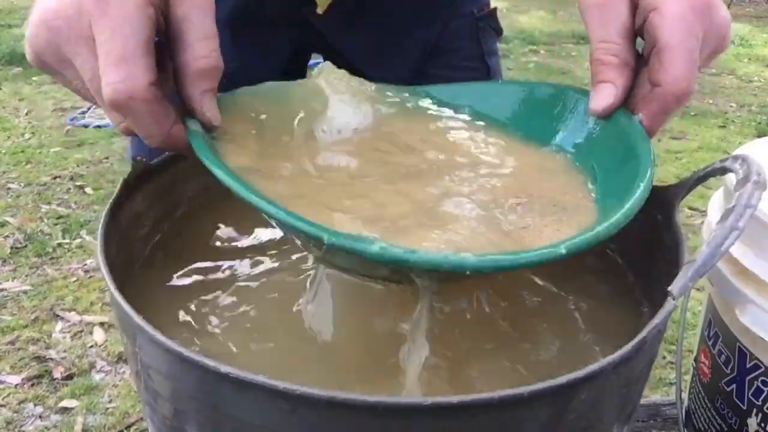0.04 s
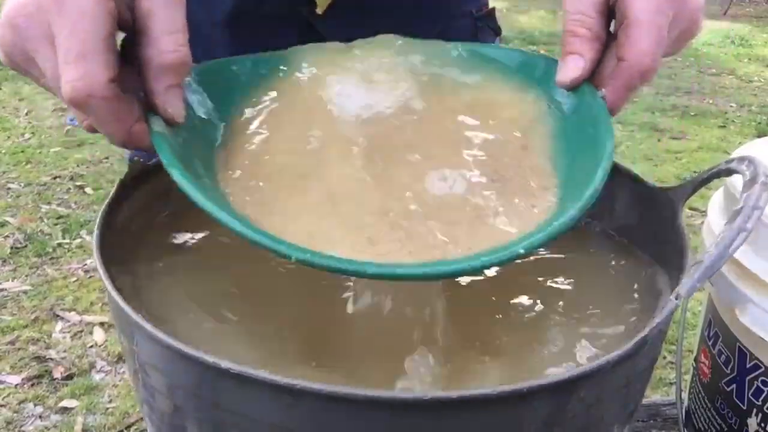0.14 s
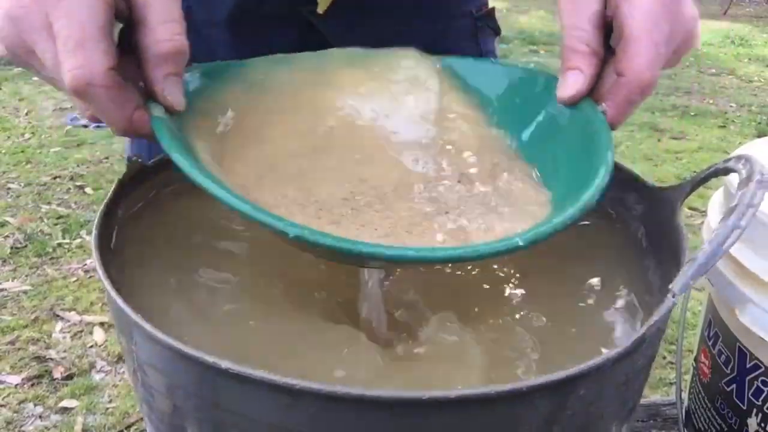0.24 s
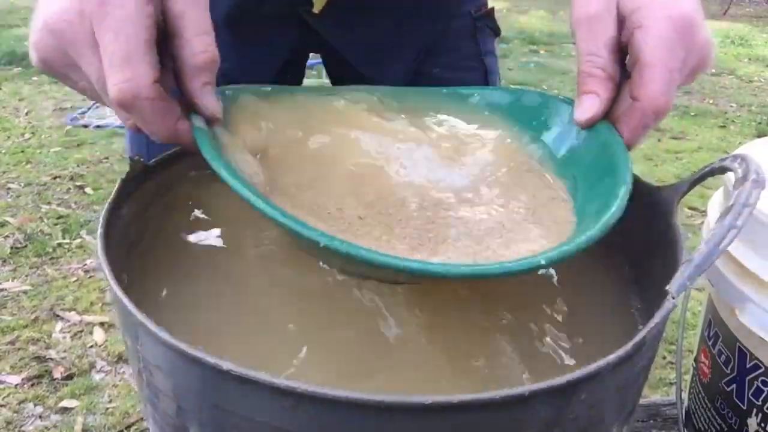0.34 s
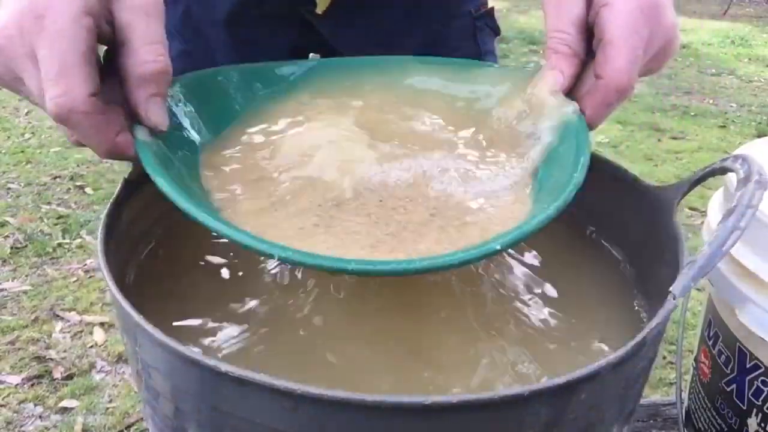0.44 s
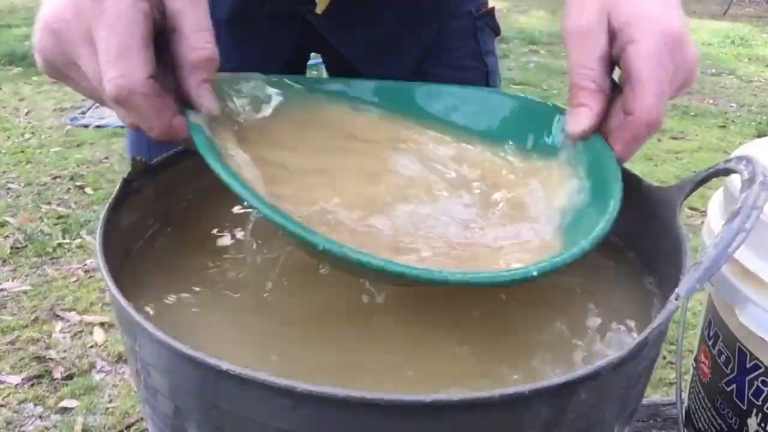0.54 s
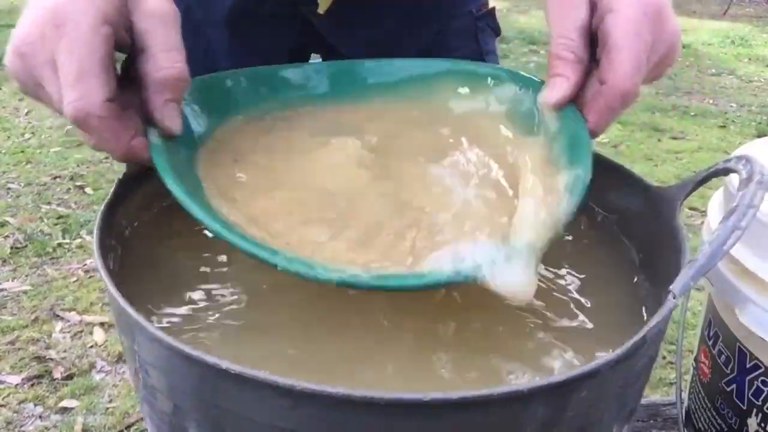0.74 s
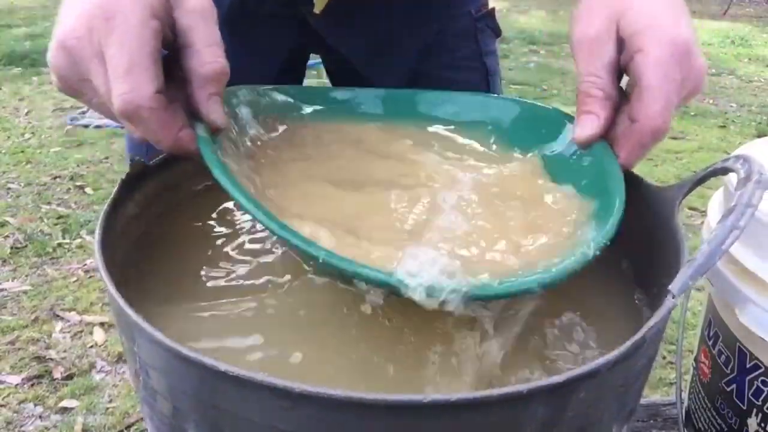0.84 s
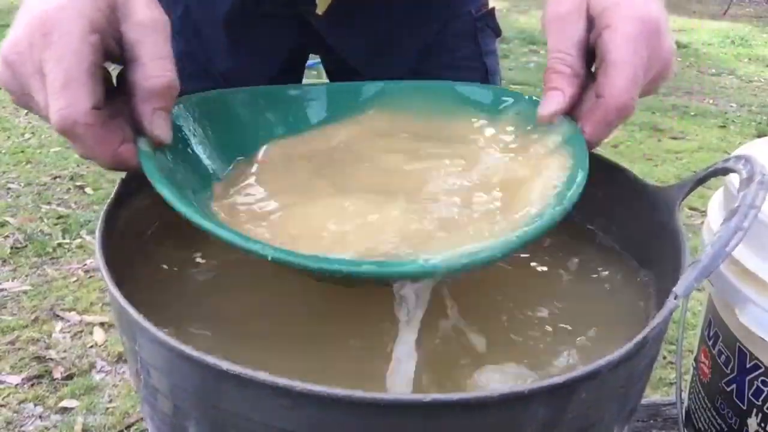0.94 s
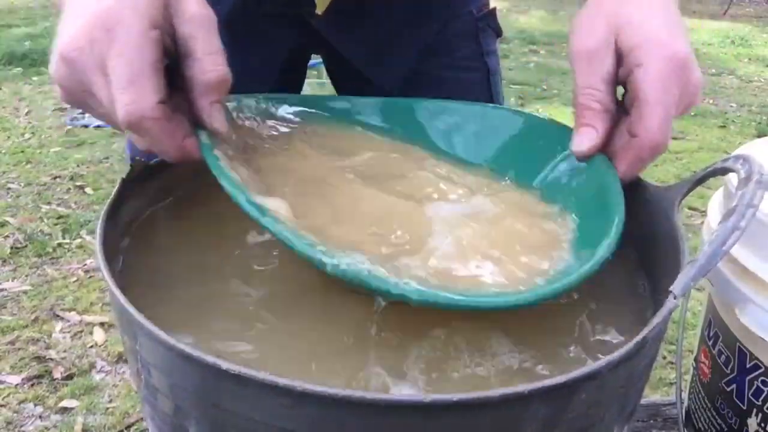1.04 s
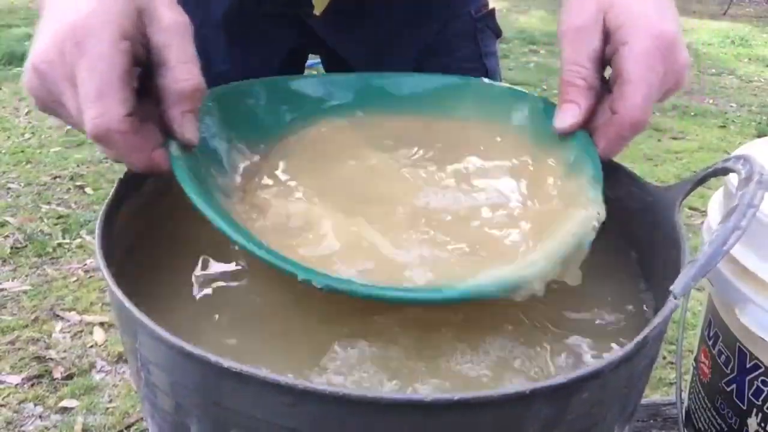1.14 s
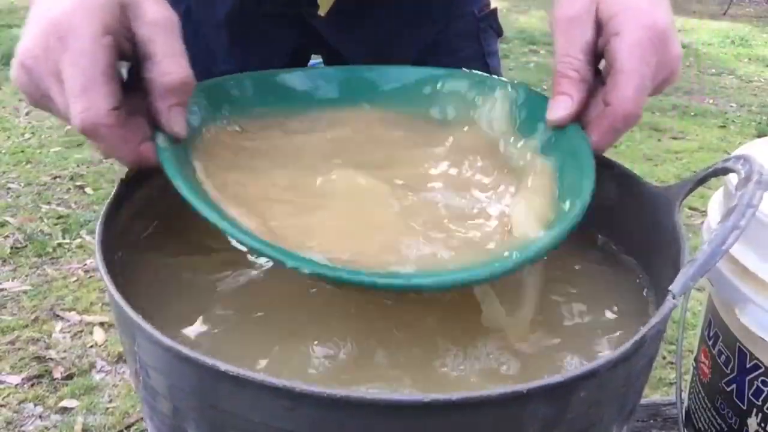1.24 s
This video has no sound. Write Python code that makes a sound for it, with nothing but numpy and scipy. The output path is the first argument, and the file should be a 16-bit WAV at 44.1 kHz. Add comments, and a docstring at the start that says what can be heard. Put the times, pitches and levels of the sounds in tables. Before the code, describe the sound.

Swirled water spills and splashes into a half-full tub, plopping and trickling close by.

```python
"""Muddy water spilling into a tub

Water is swirled in a plastic pan and spills over the rim into a half-full tub, close by, outdoors.
It slaps the surface and traps air bubbles that ring as plops; small bubbles and spray fill the gaps.
The tub wall echoes within milliseconds, over a faint hollow note and an outdoor rumble."""
import sys
import numpy as np
from scipy import signal
from scipy.fft import rfft, irfft
from scipy.io import wavfile
from scipy.ndimage import uniform_filter1d

SR = 44100
rng = np.random.default_rng(int(sys.argv[2]) if len(sys.argv) > 2 else 0)


def generate_wav(sig):
    """Save sig (samples, or channels by samples) to the path in sys.argv[1] as 16-bit PCM at SR."""
    pcm = np.round(np.clip(np.atleast_2d(sig).T, -1, 1) * 32767).astype(np.int16)
    wavfile.write(sys.argv[1], SR, pcm)


N = 57330
T = np.arange(N) / SR


# trapped air bubbles: t/s, f/Hz, level/dB, decay/cycles
PLOPS = [(0.0243, 1280, -32.5, 3.3), (.0594, 3370, -28, 8.3), (0.0775, 3630, -35, 11.5),
         (0.0965, 1418, -39.5, 8.8), (0.1105, 1676, -43.5, 7.4), (0.1225, 4670, -32, 22),
         (0.135, 3670, -35, 13), (0.1522, 3800, -32.5, 14.6), (.1655, 1280, -32.5, 7.7),
         (0.1655, 2920, -31, 3.5), (0.1895, 2650, -32.5, 1.4), (0.197, 1710, -39, 17),
         (0.211, 1198, -39, 7.7), (.2330, 1314, -32, 4.1), (0.2738, 1380, -29, 2.3),
         (0.2785, 5470, -22.5, 4.2), (0.2966, 4000, -34.5, 8.8), (.3120, 607, -47, 7.4),
         (0.3477, 4420, -23.5, 9.9), (0.3487, 2020, -32, 6.3), (.3660, 1977, -28, 14.5),
         (0.3698, 2875, -25, 7.8), (0.3704, 9000, -17.5, 4.6), (0.371, 1370, -29.5, 5.3),
         (0.406, 1200, -35.5, 9.4), (.4145, 717, -40, 4.7), (0.425, 1142, -30, 3.3),
         (0.4402, 1267, -21, 3.7), (0.4473, 4460, -24, 1.8), (0.4505, 1600, -32, 2.4),
         (.459, 2415, -21, 7.1), (0.4601, 2680, -13.5, 5.5), (0.4704, 1530, -30.5, 6.8),
         (0.4826, 1204, -22.5, 11.6), (0.522, 513, -47.5, 5), (0.523, 320, -52, 2.8),
         (0.541, 182, -45.5, 1.7), (0.579, 2090, -39.5, 6.1), (.5810, 3130, -32, 5), (0.623, 3900, -45, 21),
         (0.628, 4800, -38.5, 3.3), (.721, 3450, -48, 5), (.8360, 2220, -34, 6.9), (0.8368, 1570, -37.5, 4),
         (.8527, 1380, -33, 0.71), (0.8709, 1410, -34, 2), (0.8905, 960, -35, 1.6),
         (0.9245, 1710, -36, 4.3), (0.975, 3330, -40.5, 4.3), (1.0476, 5360, -33.5, 2.3),
         (1.1024, 1270, -29.5, 0.72), (1.113, 3630, -40, 17)]

def plops(wobble_depth=.48, wobble_s=.0012, full_wobble_hz=3500, size=8192):
    """Larger bubbles ring one by one; the smaller they are, the more the churning water shakes them."""
    out = np.zeros(N)
    for start, hz, db, cycles in PLOPS:
        shake = (wander(wobble_s, size) + 1j * wander(wobble_s, size)) / np.sqrt(2)
        depth = wobble_depth * min(hz / full_wobble_hz, 1)
        calm = bubble(hz, max(cycles, 1))
        shaken = bubble(hz, max(cycles, 1), depth * shake)
        add(out, start, undb(db) * shaken * np.linalg.norm(calm) / np.linalg.norm(shaken))
    return out


def spatter(count=6, within_s=.009, centre_hz=3300, relative_db=-12, plop_cap_db=-25):
    """Each plop scatters tiny droplets that land just after it."""
    out = np.zeros(N)
    for start, _, db, _ in PLOPS:
        gain = undb(min(db, plop_cap_db) + relative_db)
        for late, pitch, size in rng.random((count, 3)):
            droplet = bubble(centre_hz * 2 ** (2 * pitch - 1), cycles=2.5)
            add(out, start + within_s * late, size * gain * droplet)
    return out


def bubble(hz, cycles, wobble=0, rise_per_cycle=.00098, max_rise=.12):
    """A bubble swells, rings down and sharpens as it nears the surface; wobble shakes level and phase."""
    t = T[:int(7 * cycles / hz * SR) + 16]
    turns = t * hz
    attack_s = .0003 + .8 / hz
    env = (1 - np.exp(-t / attack_s)) * np.exp(-turns / cycles)
    glide_hz = hz * (1 + np.minimum(rise_per_cycle * turns, max_rise))
    tone = np.exp(2j * np.pi * np.cumsum(glide_hz) / SR) * (1 + np.resize(wobble, len(t)))
    return env / env.max() * tone.imag


# surface impacts: t/s, level/dB, centre f/Hz, decay/s
IMPACTS = [(0.0253, -37.5, 2340, 0.0035), (0.0589, -40, 3360, 0.0037), (0.1337, -45, 9050, 0.0036),
           (0.152, -39.5, 4300, 0.0051), (0.23, -43, 3000, 0.0038), (0.24, -40.5, 5560, 0.001),
           (0.2723, -34, 3330, 0.007), (0.279, -25, 6850, 0.00059), (0.3457, -38, 10500, 0.0022),
           (0.3538, -37.5, 8400, 0.004), (0.3654, -29, 3520, 0.0037), (0.3694, -24.5, 9900, 0.0017),
           (.4400, -29, 2390, 0.0011), (0.4478, -35, 6800, 0.0024), (0.47, -34, 8800, 0.00086),
           (0.4775, -44, 3620, 0.0035), (0.507, -39.5, 8350, 0.002), (0.514, -39.5, 4400, 0.0024),
           (0.518, -54, 280, 0.087), (0.5251, -41, 9650, 0.0013), (0.5309, -41, 7300, 0.00081),
           (0.552, -50, 9550, .004), (0.581, -49, 8600, 0.0043), (0.837, -38.5, 4700, 0.0052),
           (0.836, -41, 11900, 0.0016), (0.8509, -33.5, 3700, 0.0034), (0.8539, -34, 11000, 0.0029),
           (0.879, -40, 2540, 0.017), (0.9244, -39, 3400, 0.0016), (0.934, -54.5, 430, 0.0071),
           (1.092, -51.5, 14700, 0.0012), (1.1020, -41.5, 2120, 0.0071), (1.1870, -44, 14300, 0.00061),
           (1.273, -52, 2600, 0.003)]

def slaps(attack_s=.0008, width_oct=.55, size=4096):
    """Drops and waves hit the surface with brief wet cracks of band-limited noise."""
    out, t = np.zeros(N), T[:size]
    f = np.maximum(np.fft.rfftfreq(size, 1 / SR), 1)
    for start, db, hz, decay_s in IMPACTS:
        octaves = np.log2(f / hz)
        band = 1 / (1 + (octaves / width_oct) ** 2) ** .88
        treble_cut = np.exp(-np.maximum(octaves, 0) ** 2)
        env = (1 - np.exp(-t / attack_s)) * np.exp(-t / decay_s)
        burst = rng.standard_normal(size) * env
        crack = irfft(rfft(burst) * band * treble_cut, size) * np.linspace(1, 0, size)
        add(out, start, undb(db) * crack * np.linalg.norm(env / env.max()) / np.linalg.norm(crack))
    return out


# water flow: t/s, wash level/dB, spray level/dB
FLOW_LEVELS = [(0, -59, -62.5), (.045, -60, -58), (.09, -55.5, -56.5), (.15, -60, -52), (.205, -57.5, -58),
               (.285, -49.5, -53), (0.342, -58.5, -60), (.37, -55.5, -48), (0.396, -47, -46.5),
               (.425, -39, -45.5), (.47, -48.5, -52), (0.572, -54.5, -52.5), (0.612, -69, -72.5),
               (.675, -56.5, -64), (0.763, -70.5, -73.5), (0.823, -52.5, -60.5), (.865, -54.5, -48.5),
               (0.897, -47, -52.5), (0.921, -50.5, -48), (0.943, -49, -60.5), (0.979, -56.5, -56),
               (1.0, -72, -82), (1.025, -65, -70.5), (1.059, -57, -61.5), (1.11, -46.5, -53.5),
               (1.131, -60, -72.5), (1.19, -49.5, -61.5), (1.259, -71.5, -75.5), (1.275, -54, -57)]
# wash, gurgle and spray spectra: f/Hz, relative level/dB
WASH_SPECTRUM = [(250, -12), (450, -7.5), (650, -6), (1000, 3), (1350, 10.5), (1900, 5.5), (2700, 9),
                 (4300, -10), (7000, 1), (16000, -12)]
GURGLE_SPECTRUM = [(1200, -28), (2000, 13), (3800, 10.5), (6000, 2)]
SPRAY_SPECTRUM = [(1200, -32), (2800, 4), (5200, 3), (7200, -4), (9000, 2), (12000, -1), (16000, 0)]

def running_water(fully_broken_db=-57, gurgle_vs_spray_db=-8):
    """The swirl washes softly round the pan; where it breaks into drops, it gurgles and sprays."""
    times, wash_db, spray_db = np.array(FLOW_LEVELS).T
    wash_gain = undb(np.interp(T, times, wash_db))
    spray_gain = undb(np.interp(T, times, spray_db))
    broken = np.minimum(spray_gain / undb(fully_broken_db), 1)
    wash = swarm(WASH_SPECTRUM, broken, band_hz=(544, 6750), per_s=4200, spread_db=4.5, cycles=2.96)
    gurgle = swarm(GURGLE_SPECTRUM, broken, band_hz=(1220, 6860), per_s=1000, spread_db=3, cycles=3.5)
    spray = swarm(SPRAY_SPECTRUM, broken, band_hz=(3108, 15500), per_s=3400, spread_db=3.4, cycles=4.5)
    return wash * wash_gain + (spray + undb(gurgle_vs_spray_db) * gurgle) * spray_gain


def swarm(spectrum, broken, band_hz, per_s, spread_db, cycles, max_count=8000):
    """Many small random bubbles; the less broken the water, the more they blur into hiss."""
    out = np.zeros(N)
    low_hz, high_hz = band_hz
    for when, pitch, rarity, ring in rng.random((max_count, 4))[:int(per_s * N / SR)]:
        db = -spread_db * np.log(max(rarity, .02))
        hz = low_hz * (high_hz / low_hz) ** pitch
        add(out, when * N / SR, undb(db) * bubble(hz, cycles * 2 ** (2 * ring - 1)))
    random_phase = np.exp(2j * np.pi * rng.random(N // 2 + 1))
    hiss = irfft(rfft(out) * random_phase, N)
    return colour(broken * out + np.sqrt(1 - broken ** 2) * hiss, spectrum)


def tub_echo(x, delay_s=.0022, decay_s=.005, echo_db=-15, size=3000):
    """The tub wall adds a very short scatter of echoes."""
    scatter = rng.standard_normal(size) * np.exp(-T[:size] / decay_s)
    echo = np.zeros(2 * size)
    add(echo, delay_s, undb(echo_db) * scatter / np.linalg.norm(scatter))
    return x + signal.fftconvolve(x, echo)[:N]


def tub_air(hz=840, q=18, level_db=-70):
    """The air in the tub rings with a faint, unsteady note."""
    note = signal.lfilter(*signal.iirpeak(hz, q, fs=SR), rng.standard_normal(N))
    return undb(level_db) * unit(note)


# open-air spectrum: f/Hz, relative level/dB
AIR_SPECTRUM = [(25, -46), (42, -9), (60, -4), (90, 5.5), (150, -5), (300, -11.5), (500, -16), (900, -10.5),
                (2000, -38), (5000, -41), (16000, -32.5)]

def outdoors(level_db=-63, rumble_below_hz=170, sway_db=2, sway_s=.031):
    """Faint open air; its low rumble rises and falls."""
    air = colour(rng.standard_normal(N), AIR_SPECTRUM)
    rumble = signal.sosfiltfilt(signal.butter(2, rumble_below_hz, fs=SR, output="sos"), air)
    sway = undb(sway_db * wander(sway_s, N))
    return undb(level_db) * (air - rumble + rumble * sway)


def undb(db):
    """Decibels to gain."""
    return 10 ** (np.asarray(db) / 20)


def unit(x):
    """Scale to rms 1."""
    return x / np.sqrt(np.mean(x ** 2) + 1e-20)


def add(out, start_s, sound):
    """Mix a sound in at start_s."""
    i = int(np.clip(round(start_s * SR), 0, N - 1))
    out[i:i + len(sound)] += sound[:N - i]


def colour(x, spectrum):
    """Filter by (f/Hz, level/dB) points; rms 1."""
    hz, db = np.array(spectrum, float).T
    f = np.maximum(np.fft.rfftfreq(N, 1 / SR), 1)
    gain = undb(np.interp(np.log(f), np.log(hz), db))
    return unit(irfft(rfft(x) * gain, N))


def wander(span_s, size):
    """Noise smoothed over span_s; rms 1."""
    width = max(int(span_s * SR), 2)
    return unit(uniform_filter1d(uniform_filter1d(rng.standard_normal(size), width), width))


def scene():
    """Water in the tub over the outdoor air; mono."""
    water = plops() + spatter() + slaps() + running_water()
    return (tub_echo(water) + tub_air() + outdoors())[None]


def record(dry):
    """Steep low-pass at 16.2 kHz."""
    return signal.sosfilt(signal.ellip(10, .2, 70, 16200, fs=SR, output="sos"), dry)


dry = scene()
out = record(dry)
generate_wav(out)
```